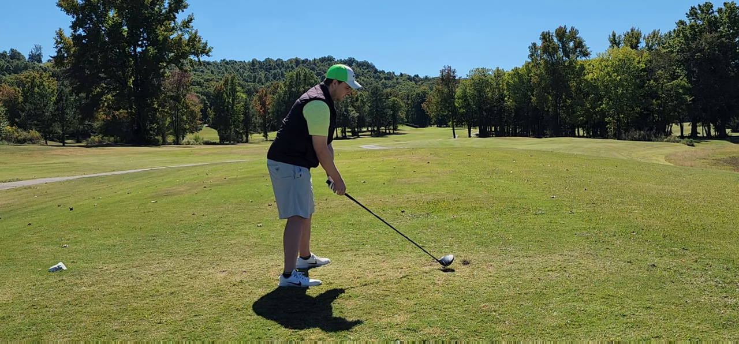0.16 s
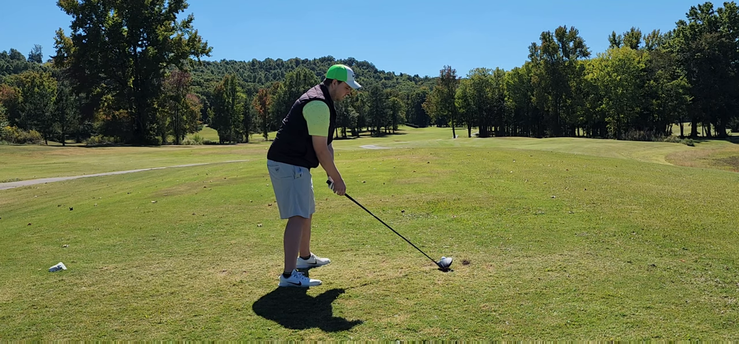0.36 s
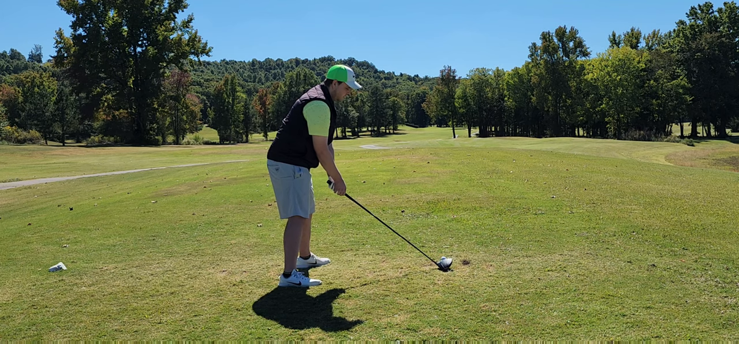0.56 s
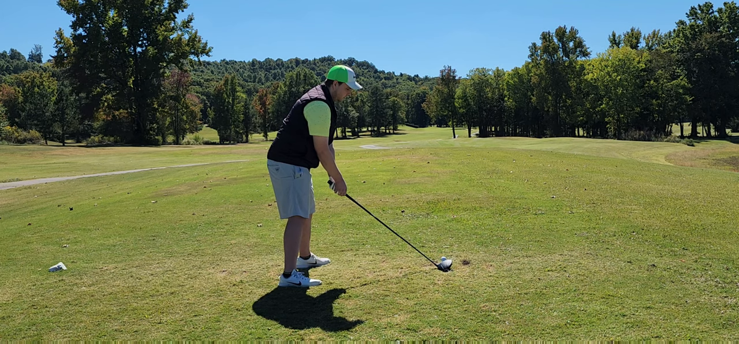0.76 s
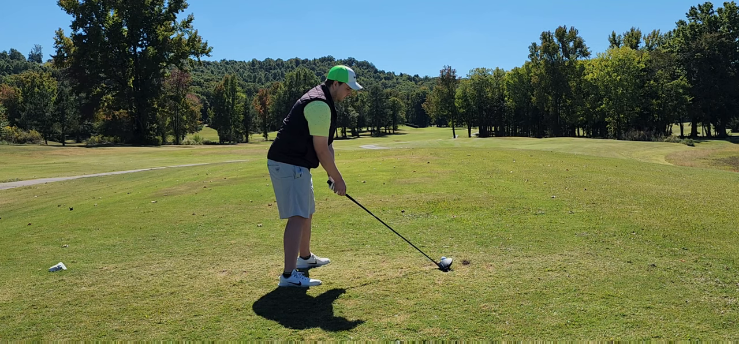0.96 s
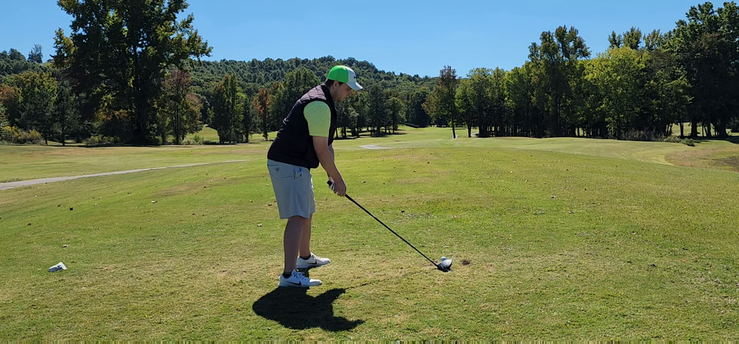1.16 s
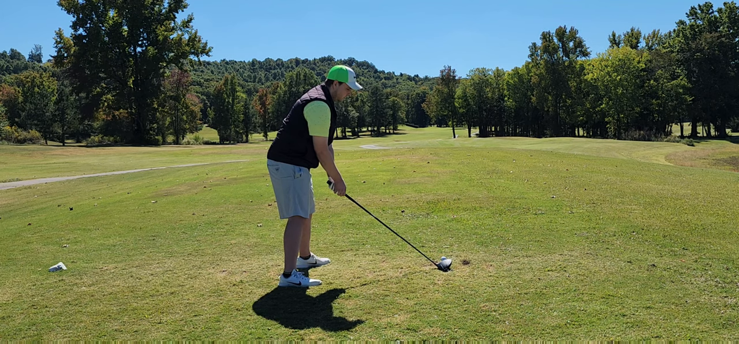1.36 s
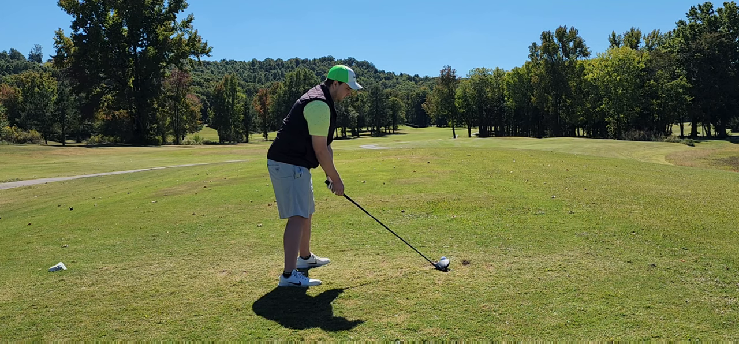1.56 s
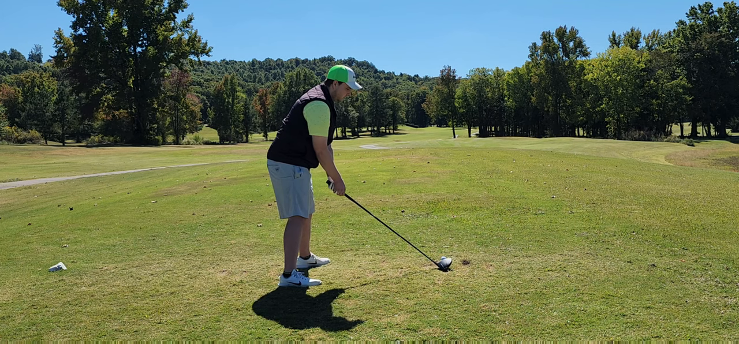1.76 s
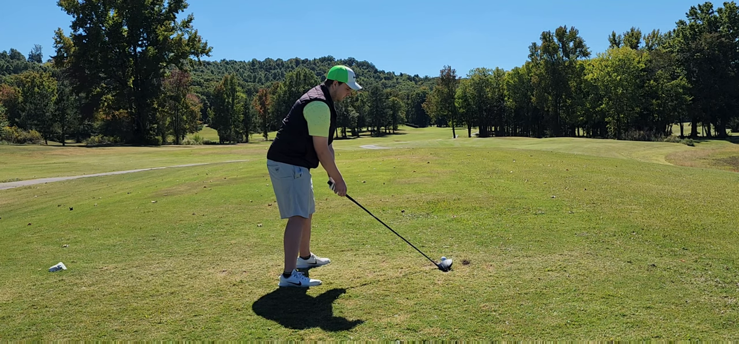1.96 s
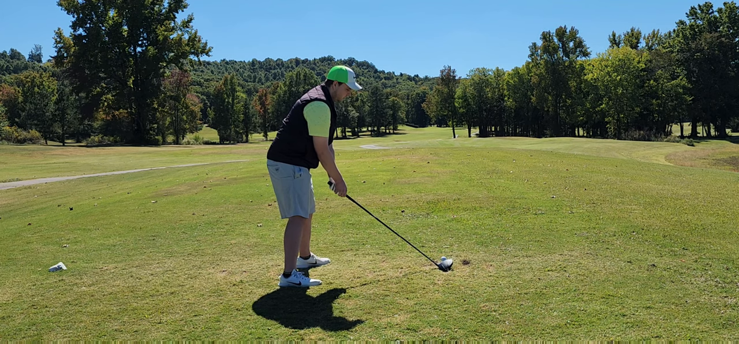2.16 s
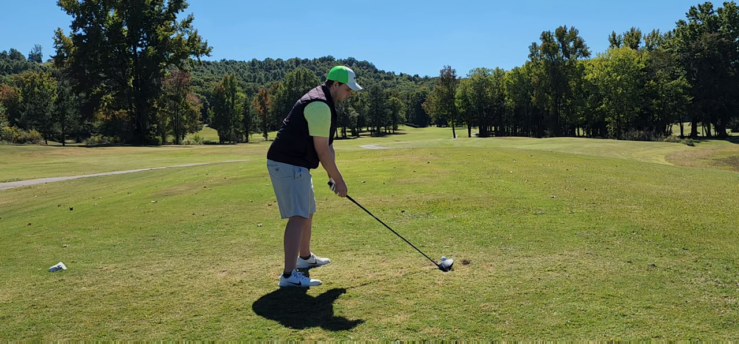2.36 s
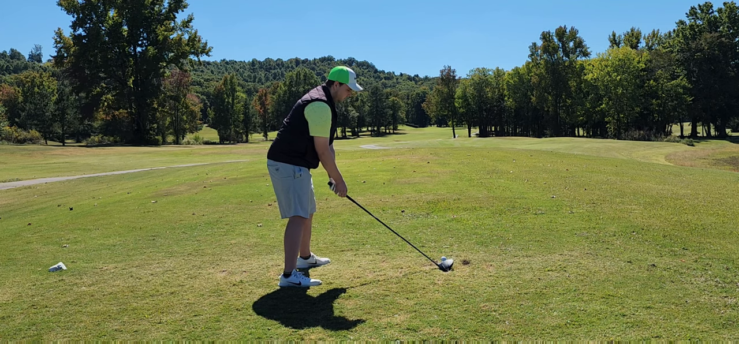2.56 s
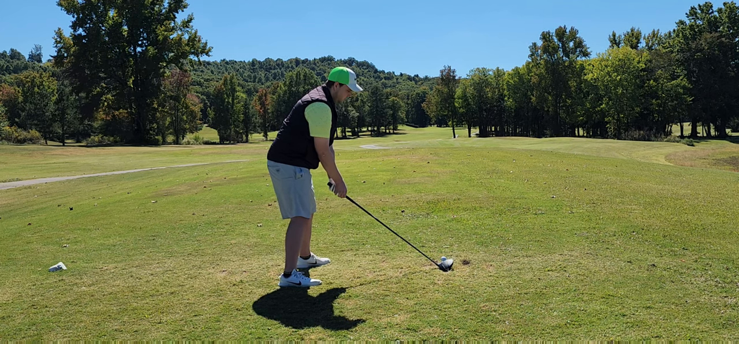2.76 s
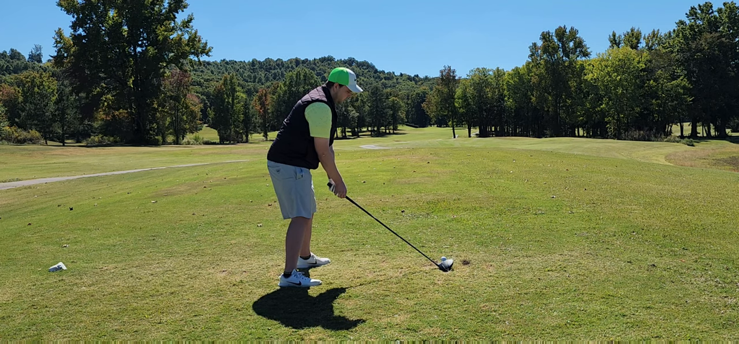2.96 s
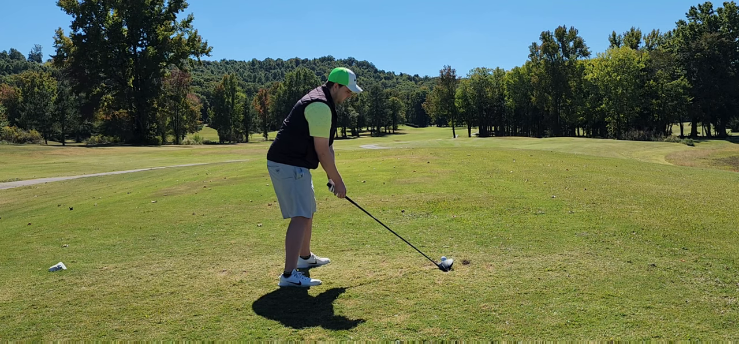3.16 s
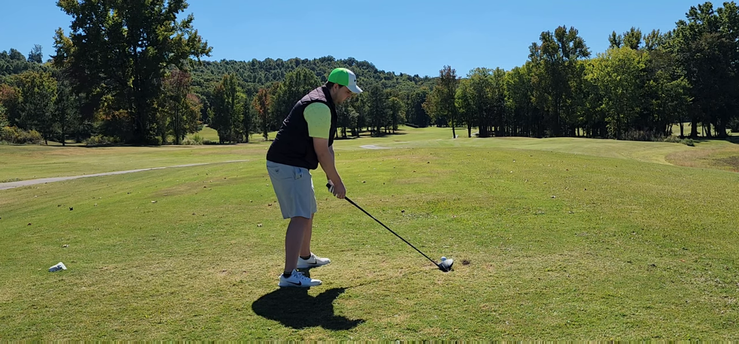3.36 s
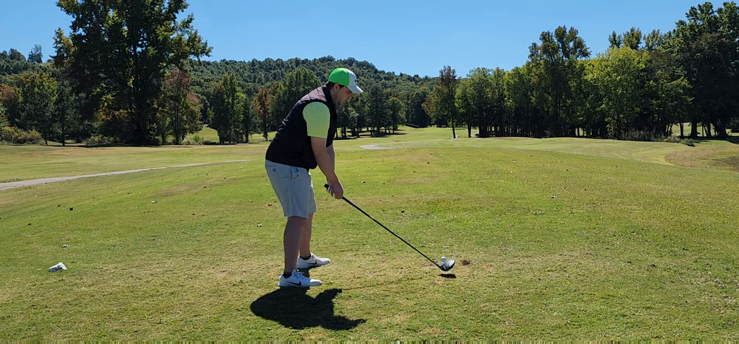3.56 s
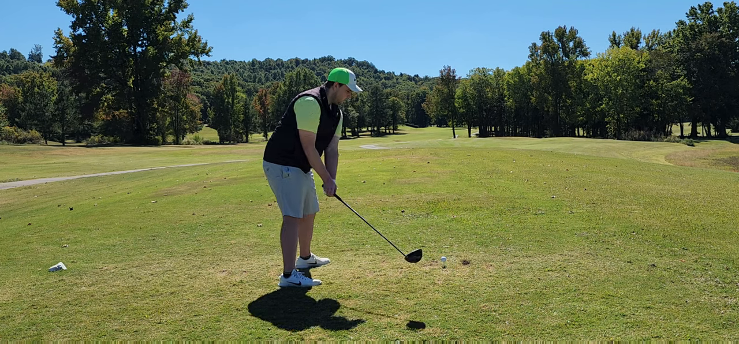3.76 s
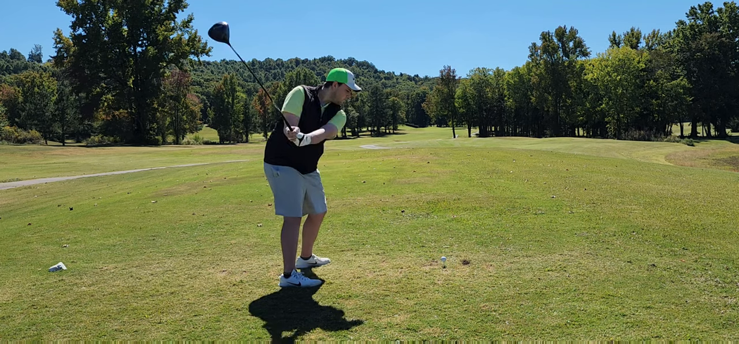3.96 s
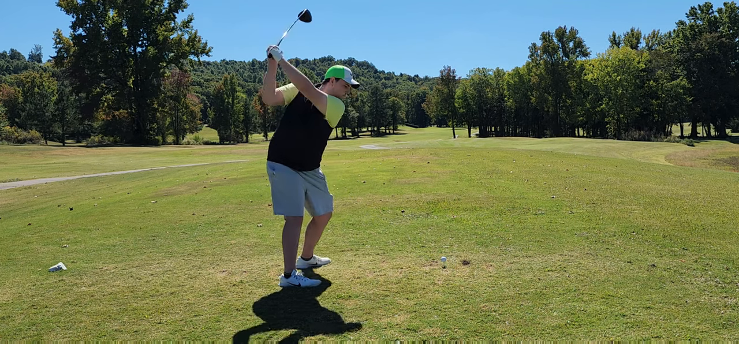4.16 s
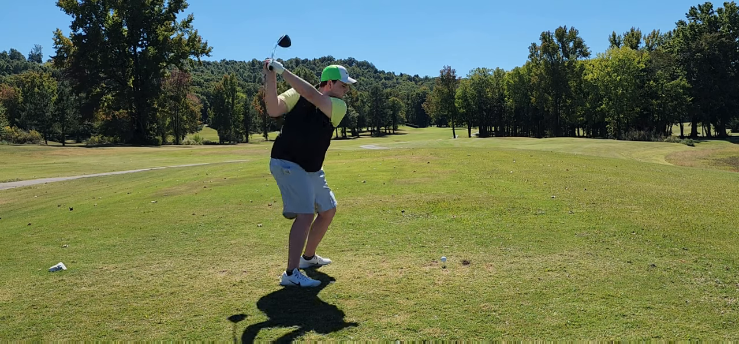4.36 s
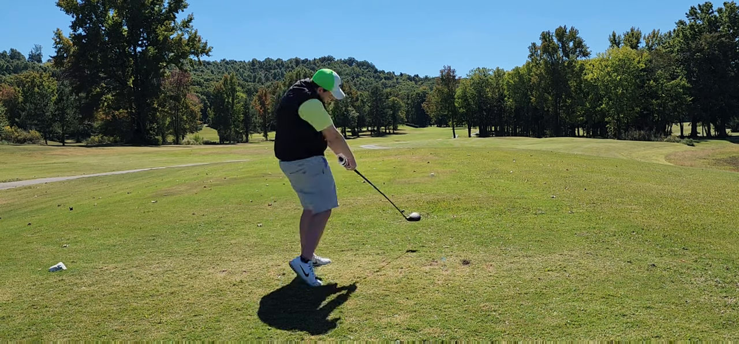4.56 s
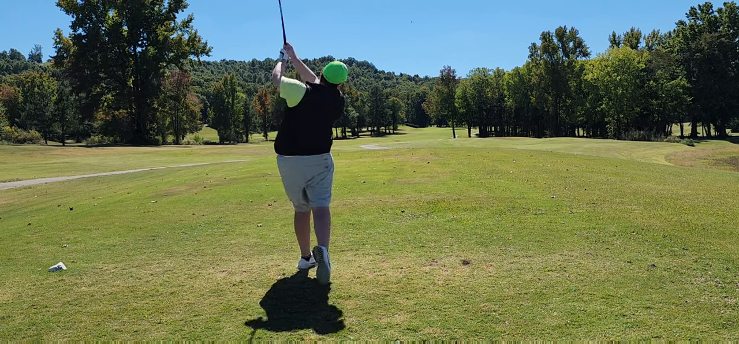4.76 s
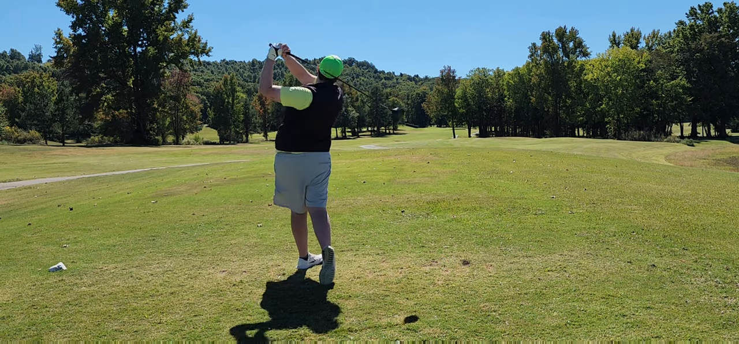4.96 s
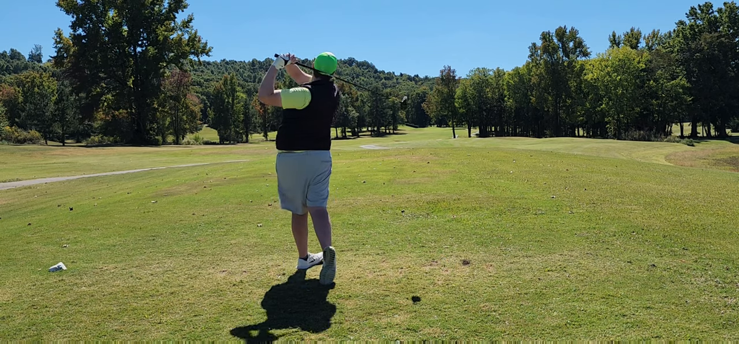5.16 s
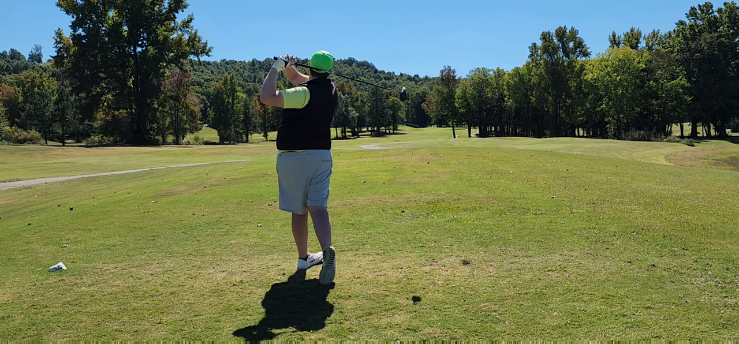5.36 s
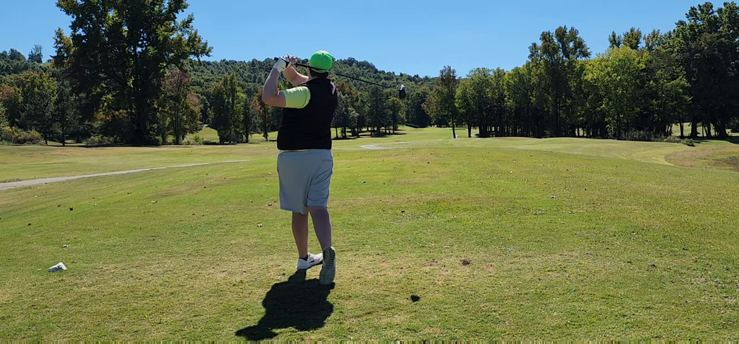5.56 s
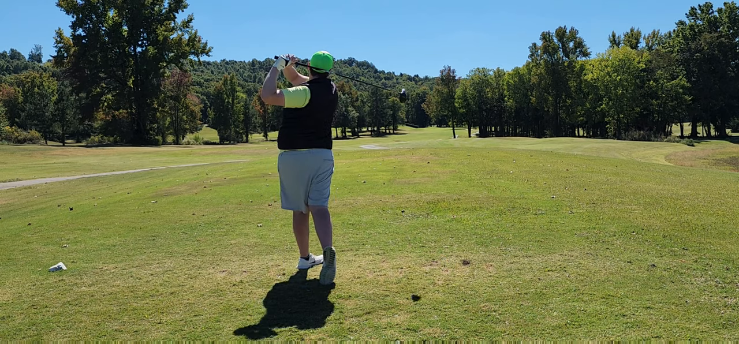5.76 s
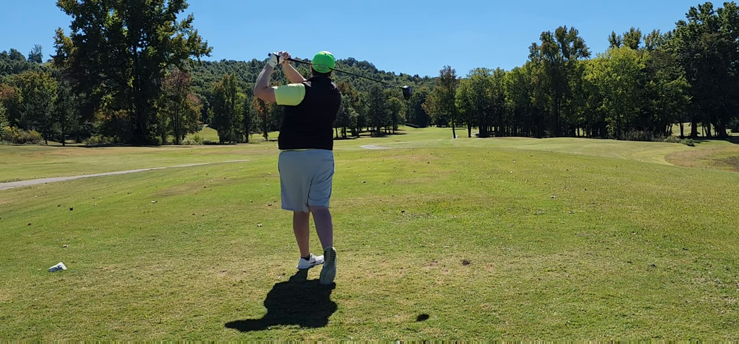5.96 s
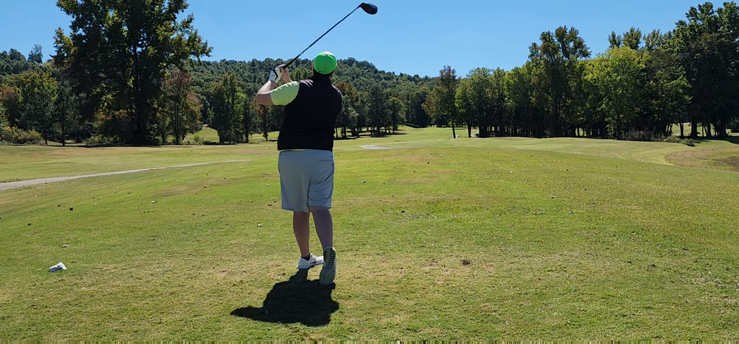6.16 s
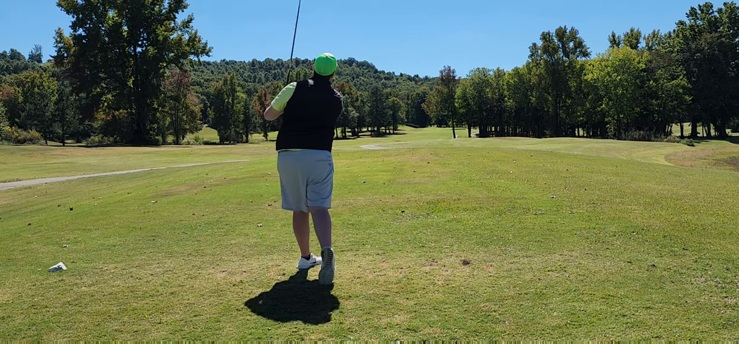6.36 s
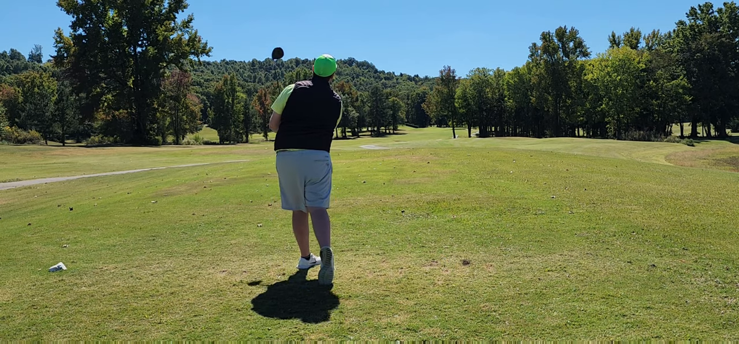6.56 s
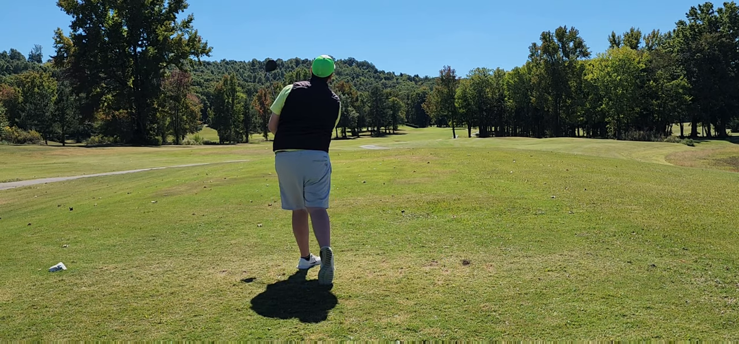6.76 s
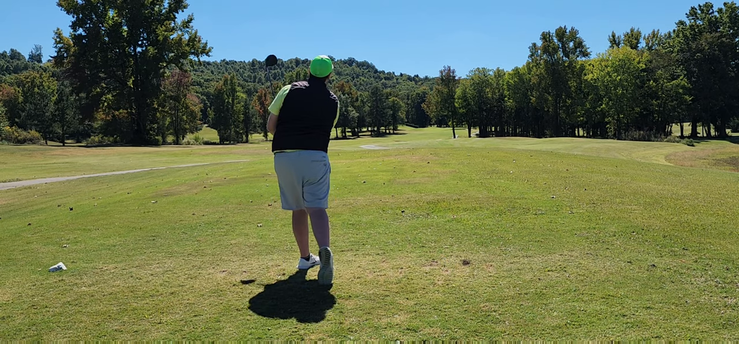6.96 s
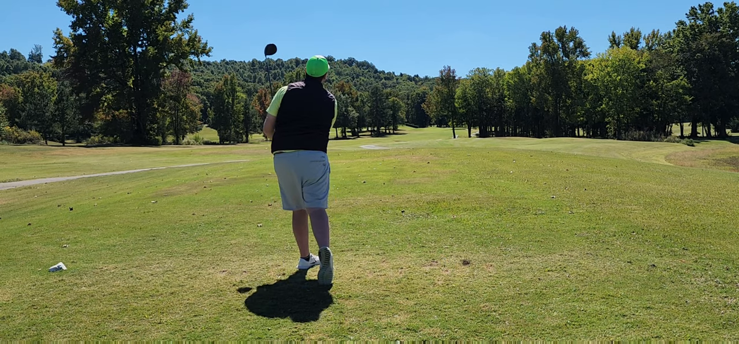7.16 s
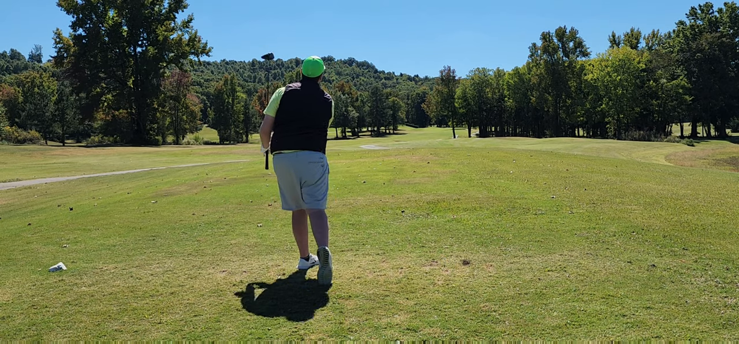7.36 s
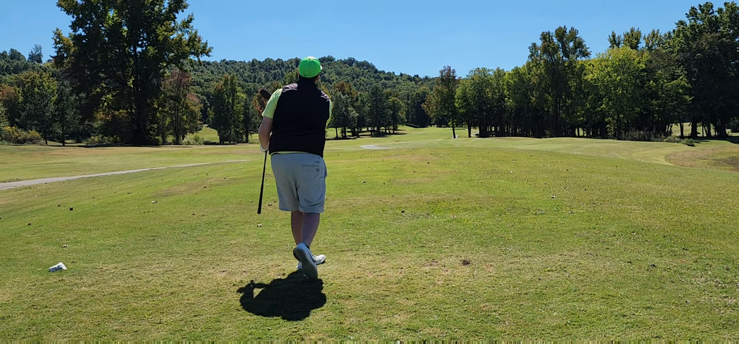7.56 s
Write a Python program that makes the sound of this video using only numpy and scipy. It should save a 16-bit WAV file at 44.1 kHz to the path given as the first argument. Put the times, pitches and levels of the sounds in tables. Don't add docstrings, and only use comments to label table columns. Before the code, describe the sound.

A stereo microphone close behind a golfer picks up low wind rumble, uneven gusts and a remote mower's hum. Faint snaps and sliding sleeve precede a brief rising swish, then one hard, bright crack with a clipped metallic ring. A rough burst of echo answers from nearby trees, with fainter returns from farther off. The background drops abruptly, then slowly recovers, with no further strikes.

```python
import sys
import numpy as np
from scipy import signal
from scipy.fft import rfft, irfft, next_fast_len
from scipy.io import wavfile
from scipy.ndimage import uniform_filter1d, map_coordinates

SR = 44100
rng = np.random.default_rng(int(sys.argv[2]) if len(sys.argv) > 2 else 0)


def wav_out(sig):
    wavfile.write(sys.argv[1], SR, np.round(np.clip(np.atleast_2d(sig).T, -1, 1) * 32767).astype(np.int16))


def invert_db(level):
    return 10 ** (np.asarray(level, dtype=float) / 20)


N = 336042

# [t/s, f/Hz]
ENGINE_SPEED = [
    (0, 684.5),
    (1.5, 684.8),
    (2.5, 686.5),
    (3.7, 686),
    (3.92, 677),
    (4.15, 686),
    (5.6, 685),
    (6.6, 680),
    (7.1, 685),
    (7.62, 679),
]
# [order, peak over the path level/dB, wander/dB]
EXHAUST_ORDERS = [(4, 3, .8), (8, -2.5, 1.5), (12, -22, 3), (13, -25, 3), (20, -40, 3)]
CASING_ORDERS = [(26, 3, 1.2), (27, -2, 2.2)]
INTAKE_ORDERS = [(32, -6, 4), (35, -8, 4), (36, -10, 4), (39, -7, 3), (40, 4, 1.2), (41, -3, 3),
                 (42, -7, 4)]
# [f/Hz, width/Hz, rms level/dB]
GEAR_TONES = [(52, 4.6, -49), (183.8, 5, -66), (1125, 8, -69.5), (2060, 8, -77), (2315, 6, -81)]
# [centre t/s, half length/s, lift/dB]
EXHAUST_FADES = [(2.61, .04, -7), (3.24, .1, -3), (4.29, .14, -23.5)]
CASING_SWELLS = [(.6, 0.083, 8.5), (1.1, 0.35, 9.4), (3.4, 0.53, 10.6), (4.1, 0.28, 7), (6.3, 0.89, 12.3),
                 (7.2, 0.27, 8.5)]
INTAKE_FADES = [(0, 0.2, -3), (3.7, 0.13, -0.5), (5.75, 0.1, -8), (6.4, 0.28, -13), (7.2, 0.19, -10)]
BLADE_SWELLS = [(.8, .3, 4), (2.35, .2, 6.5), (2.75, .07, 5.5), (3.2, .35, 4.5), (5.8, .35, 0),
                (7.3, .1, 6), (7.62, .08, 6.5)]
# [centre t/s, half length/s, lift/dB]
MOWER_TURNS = [(3.0, 0.66, 4.5), (3.95, 0.41, 3), (7.6, 0.47, 2)]
# [centre t/s, half length/s, lift/dB]
GUSTS = [(.12, 0.077, 4.5), (1.4, 0.066, 2), (1.75, 0.13, 14), (2.0, 0.086, 5), (2.42, 0.22, 16.5),
         (2.57, 0.058, 9.5), (2.9, 0.19, 9.5), (3.22, 0.072, 11), (3.55, 0.11, -16), (4.07, 0.1, 12),
         (4.36, 0.054, 7.5), (4.95, 0.21, 10), (6.25, 0.083, 1.5), (6.72, 0.049, 6.5), (7.28, 0.084, 7.5),
         (7.55, .08, 1.5)]
# [f/Hz, level per Hz/dB]
ROAR_SPECTRUM = [(600, -29), (850, -7), (1150, -1.5), (1600, -4), (2050, -5.5), (2700, -12.5),
                 (4000, -19.5), (6000, -37.5)]
WIND_SPECTRUM = [(8.8, -46.5), (15, -15.5), (48, -2.5), (77, -1), (154, -8.5), (218, -26), (284, -37.5),
                 (336, -46.5), (420, -38.5), (550, -68.5), (920, -120)]
FLUTTER_SPECTRUM = [(120, -23), (180, 1), (260, -6.5), (350, -18.5), (450, -32.5)]
TRAFFIC_SPECTRUM = [(200, -21.5), (320, -10.5), (480, -8), (620, -1), (800, -3.5), (1000, -7.5),
                    (1300, -30)]
LEAF_SPECTRUM = [(1500, -26.5), (2800, 1), (4500, -2.5), (6500, -5.5), (8500, -11.5), (10000, -25),
                 (13000, -23.5), (15500, -26), (16500, -50.5)]
# [f/Hz, likeness 0 to 1]
LIKENESS = [(20, .9), (100, .9), (400, .85), (1000, .9), (2500, .7), (5000, .3), (12000, .1)]
# [f/Hz, phase lead/rad]
LEFT_LEAD = [(0, 0), (260, .3), (600, 1.8), (1890, 5.9), (4820, 12.9), (9730, 29.1), (15800, 48)]
# [f/Hz, left minus right level/dB]
LEFT_LEAN = [(60, -0.5), (180, 0.5), (550, 1.5), (1650, 2), (4970, 4), (15000, 6.5)]
# [t/s, peak level/dB, centre f/Hz]
SNAPS = [
    (2.048, -50, 4500),
    (2.62, -35, 1700),
    (2.704, -36, 1510),
    (3.985, -51, 8600),
    (3.985, -58, 13000),
    (4.617, -34, 330),
]
# [centre t/s, half length/s, level/dB]
SLEEVE_SLIDE = (4.06, .09, -82)
# [centre t/s, half length/s, lift/dB]
RUSTLE = (4.5, .11, 1.7)
# [t/s, shaft whistle f/Hz, whistle level/dB, air rush level/dB]
DOWNSWING = [
    (4.43, 450, -63, -74),
    (4.468, 570, -58.5, -63),
    (4.490, 661.5, -53, -61),
    (4.495, 730, -41.5, -55),
    (4.525, 810, -41, -53),
    (4.55, 875, -41, -44.5),
    (4.568, 850, -44, -37.5),
    (4.579, 860, -73, -56),
    (4.655, 770, -85, -68),
]
# [f/Hz, level per Hz/dB]
RUSH_SPECTRUM = [(150, -20.5), (400, -11.5), (1200, -9.5), (2300, -5.5), (4000, -7.5), (8000, -8),
                 (11000, -17.5), (15500, -16.5), (16500, -49.5)]
HEAD_HZ = [1880, 2160, 3392, 3785, 3838, 3975, 4270, 4555, 4680, 4860, 5100, 5262, 5410, 5495, 5600, 5968,
           6200, 6920, 7335, 7620, 7840, 8200, 9100, 10500]
# [level/dB, t60/s, left minus right/dB, t of a quiet lobe/s, lobe depth/dB]
HEAD_MODES = [(-55, .4, 1, 0, 0), (-43, .11, 0, .017, -5), (-29.5, .17, -3, .002, -4), (-25, .05, -2, 0, 0),
              (-31, .1, -2, .004, -6), (-25, .06, -3.5, .022, -3), (-37, .05, 0, 0, 0),
              (-38, .11, 0, .006, -8), (-45, .25, 0, .02, -6), (-30, .05, 0, .024, -8),
              (-29, .04, 1, .012, -6), (-28, .17, 2, .061, -11), (-22, .05, 1, 0, 0),
              (-31, .12, 0, .005, -8), (-36, .1, 0, .004, -5), (-22, .075, 0, .017, -11),
              (-36, .05, 0, 0, 0), (-30, .05, 0, .002, -8), (-25, .075, -4, .013, -13), (-31, .04, 3, 0, 0),
              (-34, .07, 0, .012, -6), (-31, .04, -4, 0, 0), (-33, .035, 3, 0, 0), (-40, .03, 0, 0, 0)]
# [f/Hz, contact time/s, level/dB]
FACE_FLEX = (5400, .0012, -7.5)
# [t after the blow/s, pitch factor]
RECEDE = [(0, 1), (.02, 1.009), (.05, 1.031), (.1, 1.075), (.2, 1.11)]
# [t after the blow/s, gain/dB]
SQUEEZE = [(0, 3), (.003, -2), (.0052, -8), (.0068, -4), (.012, -6), (.03, -1.5), (.06, -5.5), (.09, -5),
           (.2, -29.5)]
# [rise/s, hold/s, t60/s, level/dB, left lag/samples]
SPRAY = (.0015, .0085, .012, -32, 2)
# [start t/s, rise/s, hold/s, t60/s, level/dB, pitch factor toward them]
TREE_LINES = [
    (4.656, 0.0074, 0.022, 0.23, -42.5, 1.09),
    (4.951, 0.035, 0.082, 0.21, -66.5, 1.12),
    (5.072, 0.005, 0.032, 0.086, -64, 1.01),
    (5.27, 0.016, 0.08, .25, -73, 1.005),
]

BLOW_S = 4.57395
EXHAUST_DB, CASING_DB, INTAKE_DB, BLADE_DB, ROAR_DB = -42.5, -82, -66.5, -44.5, -64
RUMBLE_DB, BUFFET_DB, FLUTTER_DB, TRAFFIC_DB, LEAVES_DB = -55, -60.5, -93, -67.5, -78
WINDWARD_DB = 3.5
FLUTTER_SHARE = 1.8
LEAF_RISE_DB_PER_S = 0.5
GRIP_S, LET_GO_S, GRIP_DB, GRIP_BASS_DB = .36, .08, 0.5, -11.5
SETTLE_DB, CREEP_DB_PER_S = -5, 0.82
SOLE_TURNS_S = 0.03586
LOBE_S = .006
TREBLE_LEAN_DB = 6
CLUMPS_DB = 1.3
EDGE_HZ = 15350


def evened(x):
    return x / np.sqrt(np.mean(x ** 2) + 1e-20)


def read(points, hz):
    f, value = np.transpose(points)
    return np.interp(np.log(hz + 1), np.log(f + 1), value)


def curve(rows, t, axis=1):
    rows = np.array(rows)
    return np.interp(t, rows[:, 0], rows[:, axis])


def swells(rows, t):
    return sum(db * np.exp(-((t - s) / half) ** 2) for s, half, db in rows)


def drift(per_s):
    steps = np.arange(0, N + 256, 256)
    slow = map_coordinates(rng.standard_normal(200), [steps * per_s / SR % 199], order=3)
    return np.interp(np.arange(N), steps, slow)


def duck(t, grip_db):
    after = t - BLOW_S
    grip = grip_db / (1 + np.exp(np.clip((after - GRIP_S) / LET_GO_S, -50, 50)))
    settle = np.minimum(SETTLE_DB + CREEP_DB_PER_S * after, 0)
    return (after > 0) * (grip + settle)


def add(mix, s, sound):
    part = mix[..., round(s * SR):][..., :sound.shape[-1]]
    part += sound


def resonate(x, hz, width):
    turn = np.exp(2j * np.pi * np.cumsum(hz * np.ones(len(x))) / SR)
    r = np.exp(-np.pi * width / SR)
    return 2 * (turn * signal.lfilter([1 - r], [1, -r], x / turn)).real


def far_side(hz):
    lead = np.interp(hz, *np.transpose(LEFT_LEAD))
    return invert_db(read(LEFT_LEAN, hz) / 2) * np.exp(.5j * lead)


def from_left(x):
    size = next_fast_len(N)
    side = far_side(np.fft.rfftfreq(size, 1 / SR))
    return irfft(rfft(x, size) * np.array([side, 1 / side]), size)[:, :N]


def noise(spectrum, band, size, patchy_db, like=0.92, far=True, count=N):
    hop = size // 4
    hz = np.fft.rfftfreq(size, 1 / SR)
    hz = hz[hz < spectrum[-1][0]]
    frames = count // hop + 5
    a, b, c, d, patches = rng.standard_normal((frames, len(hz), 5)).T
    patches = uniform_filter1d(patches, size=9, axis=0)
    patches = evened(uniform_filter1d(patches, size=9, axis=1))
    same = np.clip(like * read(LIKENESS, hz), 0, .99)[:, None]
    left = a + 1j * b
    right = same * left + np.sqrt(1 - same ** 2) * (c + 1j * d)
    side = far_side(hz)[:, None] if far else 1
    z = np.array([left * side, right / side])
    z = z * invert_db(read(spectrum, hz)[:, None] + patchy_db * patches)
    inside = (hz > band[0]) & (hz < band[1])
    share = (abs(z[:, inside]) ** 2).sum() / (abs(z) ** 2).sum()
    z = np.pad(z, ((0, 0), (0, size // 2 + 1 - len(hz)), (0, 0)))
    sound = signal.istft(z, nperseg=size, noverlap=size - hop)[1][:, :count]
    return evened(sound) / np.sqrt(share)


def gear():
    size = next_fast_len(N)
    f = np.fft.rfftfreq(size, 1 / SR)
    peaks = sum(invert_db(db) * np.sqrt(SR / width) / (1 + (2 * (f - hz) / width) ** 2)
                for hz, width, db in GEAR_TONES)
    return irfft(rfft(rng.standard_normal(size)) * peaks, size)[:N]


def mower(t):
    turns = np.cumsum(curve(ENGINE_SPEED, t) / 40 * (1 + .002 * drift(6))) / SR
    low_db, high_db = duck(t, GRIP_BASS_DB), duck(t, GRIP_DB)
    roar_db = ROAR_DB + swells(MOWER_TURNS, t) + high_db
    blade_db = BLADE_DB + swells(BLADE_SWELLS, t) + 1.1 * low_db
    tones = invert_db(blade_db) * np.sin(2 * np.pi * np.cumsum(97 + .6 * drift(4)) / SR)
    tones += invert_db(roar_db + 62) * gear()
    paths = ((EXHAUST_ORDERS, EXHAUST_DB + swells(EXHAUST_FADES, t) + low_db),
             (CASING_ORDERS, CASING_DB + swells(CASING_SWELLS, t) + high_db),
             (INTAKE_ORDERS, INTAKE_DB + swells(INTAKE_FADES, t) + high_db))
    for orders, path_db in paths:
        for k, db, wander_db in orders:
            level = invert_db(path_db + db + wander_db * drift(4.0))
            tones += level * np.sin(2 * np.pi * (k * turns + rng.random()))
    tones *= invert_db(0.65 * drift(13))
    throb = 1 + .15 * np.cos(2 * np.pi * 4 * turns)
    roar = noise(ROAR_SPECTRUM, (1200, 2600), size=1024, patchy_db=1.5)
    return from_left(tones) + invert_db(roar_db + 0.45 * drift(45)) * throb * roar


def air(t):
    gust_db = swells(GUSTS, t) + 2.0 * drift(9.9)
    high_db = duck(t, GRIP_DB)
    ports = invert_db(WINDWARD_DB * np.array([[-1.], [1.]]))

    rumble = noise(WIND_SPECTRUM, (105, 128), size=2048, patchy_db=3.5, like=0.74)
    sound = invert_db(RUMBLE_DB + 1.1 * drift(5) + high_db) * rumble

    buffet = noise(WIND_SPECTRUM, (105, 128), size=2048, patchy_db=4.5, like=.2, far=False)
    sound += ports * invert_db(BUFFET_DB + gust_db + high_db) * buffet

    flutter_db = FLUTTER_DB + FLUTTER_SHARE * gust_db + .6 * high_db
    flutter = noise(FLUTTER_SPECTRUM, (235, 330), size=1024, patchy_db=5.5, like=0.46)
    sound += ports * invert_db(flutter_db) * flutter

    traffic = noise(TRAFFIC_SPECTRUM, (480, 660), size=1024, patchy_db=1.5)
    sound += invert_db(TRAFFIC_DB + .8 * high_db) * traffic

    breeze_db = LEAF_RISE_DB_PER_S * (np.minimum(t, BLOW_S) - 2.3) + swells([RUSTLE], t)
    leaves = noise(LEAF_SPECTRUM, (7000, 9500), size=512, patchy_db=1.67)
    return sound + invert_db(LEAVES_DB + breeze_db + 1.4 * high_db) * leaves


def snaps(t):
    out, t = np.zeros(N), t[:2000]
    shape = np.minimum(t / .002, 1) * invert_db(-60 * t / .027)
    for s, db, hz in SNAPS:
        snap = (1 + .6 * rng.standard_normal(2000)) * np.cos(2 * np.pi * hz * t) * shape
        snap = resonate(resonate(snap, hz, .6 * hz), hz, .6 * hz)
        add(out, s, invert_db(db - 9) * snap)
    return out


def sleeve(t):
    s, half, db = SLEEVE_SLIDE
    high = signal.butter(4, 9000, "high", fs=SR, output="sos")
    rub = signal.sosfilt(high, rng.standard_normal((2, N)))
    return invert_db(db) * np.exp(-((t - s) / half) ** 2) * evened(rub)


def swish(t):
    rush = noise(RUSH_SPECTRUM, (2500, 12000), size=256, patchy_db=3, like=1.1, far=False, count=SR // 2)
    out = np.zeros((2, N))
    t = t[(t > DOWNSWING[0][0]) & (t < DOWNSWING[-1][0])]
    hz = curve(DOWNSWING, t)
    eddies = rng.standard_normal(SR)[:len(t)]
    whistle = evened(resonate(resonate(eddies, hz, 130), hz, 88))
    overtone = resonate(resonate(eddies, 1.9 * hz, 400), 1.9 * hz, 500)
    whistle += invert_db(-8.0) * evened(overtone)
    near_hands = resonate(resonate(eddies, 0.84 * hz, 420), 0.55 * hz, 500)
    whistle += invert_db(-0.5) * evened(near_hands)
    whistle += invert_db(-2.5) * np.sin(2 * np.pi * np.cumsum(hz) / SR)
    whistle_gain = invert_db(curve(DOWNSWING, t, axis=2))
    rush_gain = invert_db(curve(DOWNSWING, t, axis=3))
    add(out, t[0], whistle_gain * whistle + rush_gain * rush[:, :len(t)])
    return out


def crack(pitch=1., glide=0.96):
    t = np.arange(9000) / SR
    warped = pitch * np.cumsum(1 + glide * (curve(RECEDE, t) - 1)) / SR
    db, t60, pan_db, lobe_s, lobe_db = np.transpose(HEAD_MODES)[:, :, None]

    turning = uniform_filter1d(rng.standard_normal((len(HEAD_MODES), len(t))), size=300, axis=1)
    sweep_db = lobe_db * np.exp(-((t - lobe_s) / LOBE_S) ** 2)
    sweep_db = sweep_db + 2.0 * evened(turning) * np.minimum(t / .006, 1)
    modes = invert_db(db + 9.0 + sweep_db - 60 * t / t60) * np.sin(2 * np.pi * np.c_[HEAD_HZ] * warped)
    modes *= np.minimum(t / .0007, 1)
    modes[0] *= np.clip(t / SOLE_TURNS_S, 0, 1) ** 6
    ring = np.array([(modes * invert_db(pan_db / 2)).sum(0), (modes / invert_db(pan_db / 2)).sum(0)])

    face_hz, contact, face_db = FACE_FLEX
    touching = np.sin(np.pi * np.minimum(t / contact, 1))
    flex = invert_db(face_db) * touching * np.sin(2 * np.pi * face_hz * warped)

    u = np.maximum(t - .00008, 0) / .00007
    push = invert_db(-4) * u * (2.7 - u) * np.exp(-u)

    band = signal.butter(2, [3500, 8500], "band", fs=SR)
    grit = signal.lfilter(*band, rng.standard_normal((2, len(t))))
    spit = invert_db(-23.5 - 60 * t / .02) * np.diff(rng.standard_normal((2, len(t) + 1)))
    spit += invert_db(-19.5 - 60 * t / 0.11) * grit
    return push, ring + flex + spit * np.minimum(t / 0.00044, 1)


def spray(t):
    start, hold, t60, db, lag = SPRAY
    band = signal.butter(3, [7600, 15500], "band", fs=SR, output="sos")
    fizz = signal.sosfilt(band, rng.standard_normal((3, len(t))))
    fizz = np.array([np.roll(fizz[0], shift=lag), fizz[0]]) + .3 * fizz[1:]
    fade = invert_db(db - 60 * np.maximum(t - start - hold, 0) / t60)
    return np.clip(t / start, 0, 1) ** 2 * fade * evened(fizz)


def strike():
    push, ring = crack()
    t = np.arange(len(push)) / SR
    dulled = signal.lfilter([.6], [1, -.4], ring)
    bounce = np.pad(dulled, ((0, 0), (275, 0)))[:, :len(push)]
    sound = (push + ring + invert_db(-13) * bounce) * invert_db(curve(SQUEEZE, t))
    sound[0] = np.roll(sound[0], shift=2)
    out = np.zeros((2, N))
    add(out, BLOW_S, sound + spray(t))
    return out


def trees(t):
    out, hz, t = np.zeros((2, N)), np.fft.rfftfreq(1024, 1 / SR), t[:SR // 2]
    treble = 1 / (1 + (8000 / (hz + 1)) ** 4)
    lean_db = TREBLE_LEAN_DB * np.outer([.5, -.5], 1 / (1 + (5000 / (hz + 1)) ** 4))
    for s, rise, hold, t60, db, pitch in TREE_LINES:
        trip = s - BLOW_S
        call = sum(crack(pitch, .12 / trip))[0, :1024]
        call = rfft(call * invert_db(-60 * t[:1024] / (0.038 + 0.34 * trip)))
        call /= (abs(call) + 1e-9) ** np.clip(.5 - trip, 0, 1)
        call *= invert_db(3.7 * np.log2(hz / 5000 + .01) - 44.0 * trip * (hz / 9000) ** 2)
        call /= np.linalg.norm(irfft(call))
        leaves = invert_db(db) * np.minimum(t / rise, 1) * rng.standard_normal((2, len(t)))
        clumps = uniform_filter1d(rng.standard_normal(len(t)), size=180)
        leaves *= invert_db(CLUMPS_DB * evened(clumps))
        for part, haste in ((1 - treble, 1), (treble, 1.6)):
            shape = invert_db(-60 * haste * np.maximum(t - rise - hold / haste, 0) / t60)
            copy = irfft(call * part * invert_db(lean_db))
            add(out, s, signal.oaconvolve(shape * leaves, copy, axes=1))
    return out


def scene():
    t = np.arange(N) / SR
    return mower(t) + air(t) + snaps(t) + sleeve(t) + swish(t) + strike() + trees(t)


def low_pass(x):
    return signal.sosfilt(signal.butter(12, 16310, fs=SR, output="sos"), x)


def record(dry):
    limited = np.tanh(dry / 1.25) * 1.25
    edge = signal.firwin(numtaps=255, cutoff=EDGE_HZ, window=("kaiser", 7), fs=SR)
    mix = signal.oaconvolve(limited, edge[None], "same")
    return low_pass(mix)


dry = scene()
out = record(dry)
wav_out(out)
```